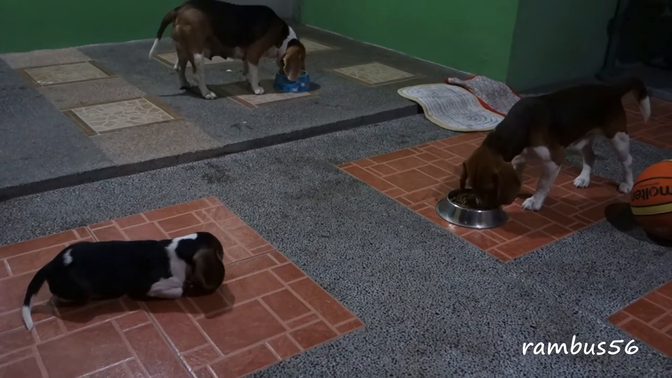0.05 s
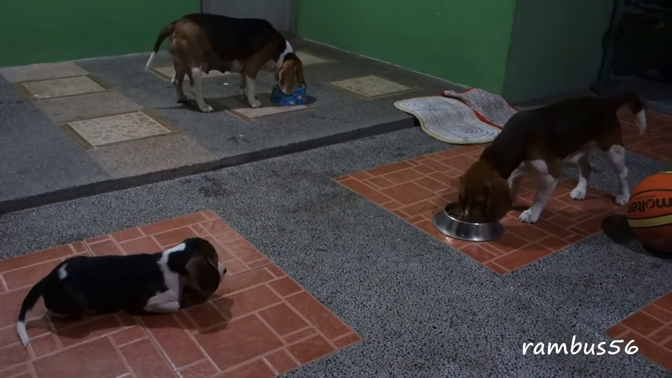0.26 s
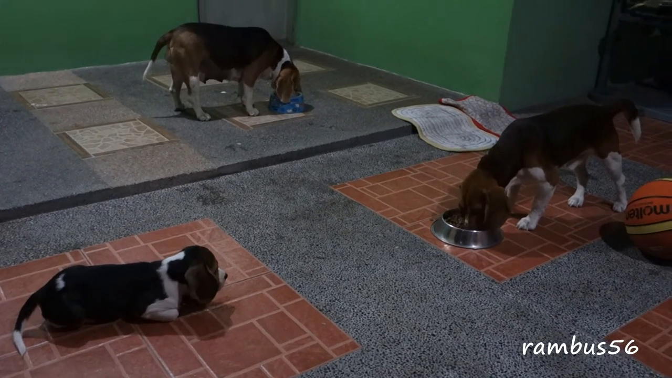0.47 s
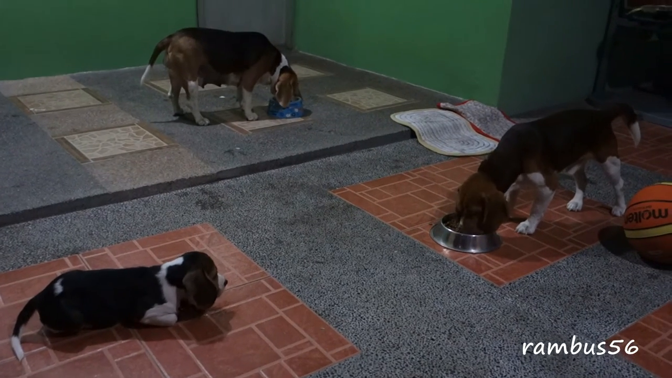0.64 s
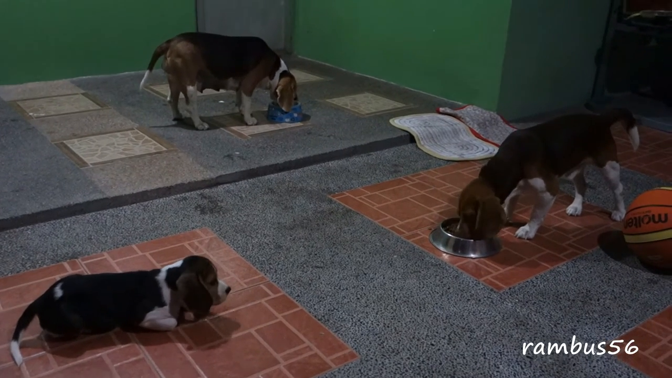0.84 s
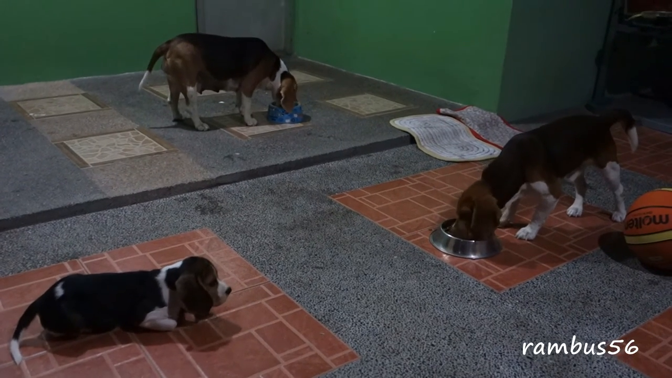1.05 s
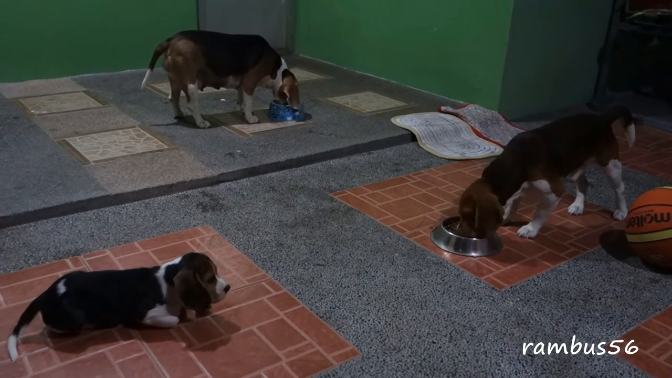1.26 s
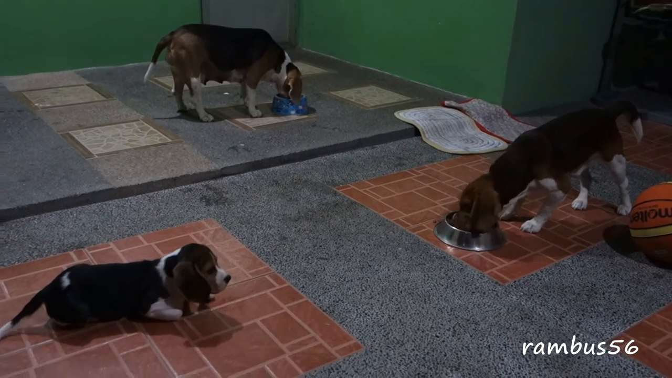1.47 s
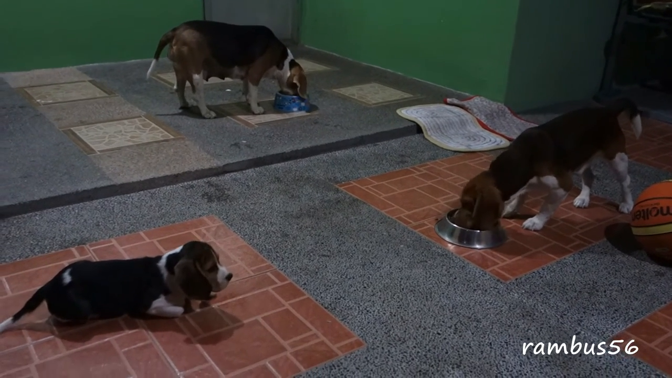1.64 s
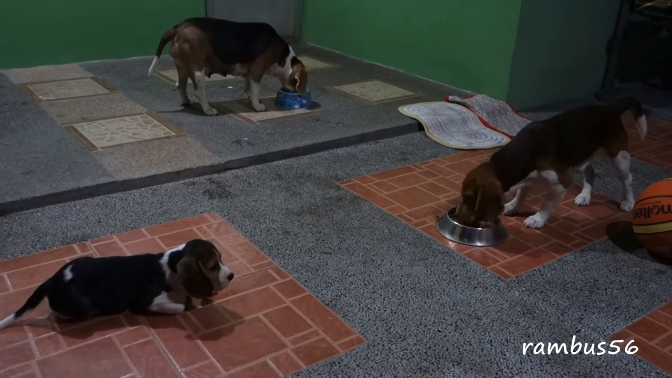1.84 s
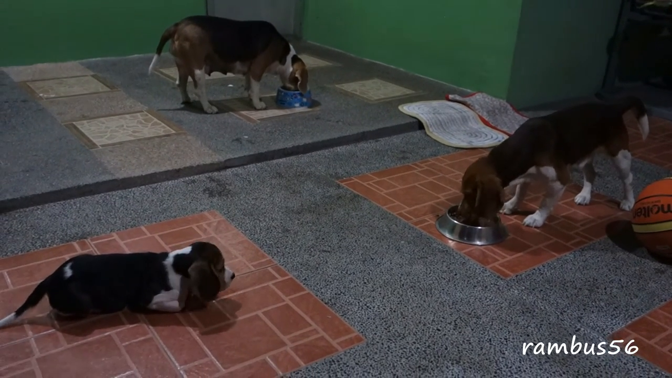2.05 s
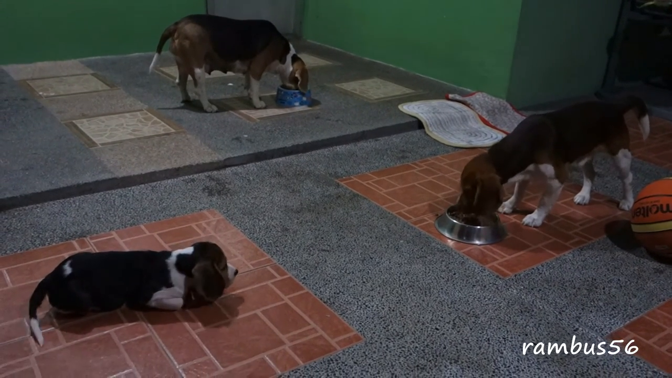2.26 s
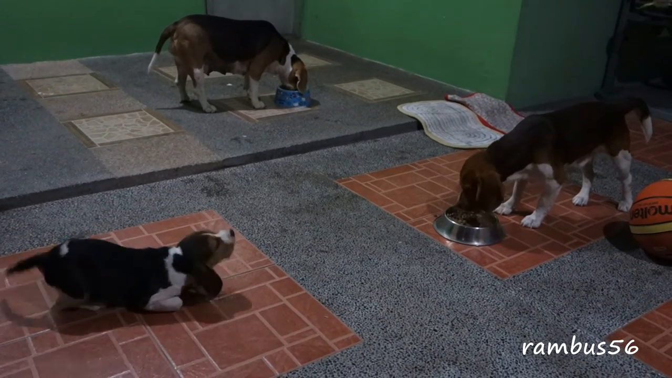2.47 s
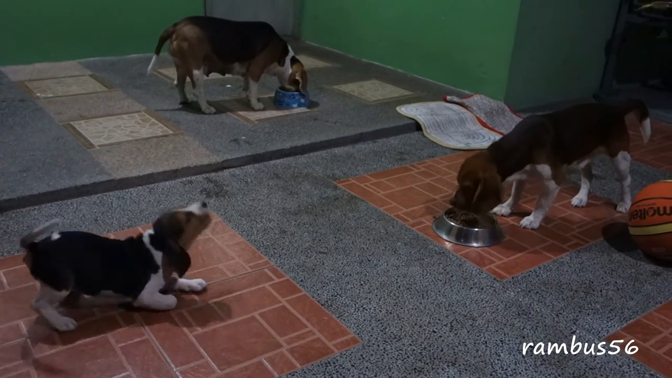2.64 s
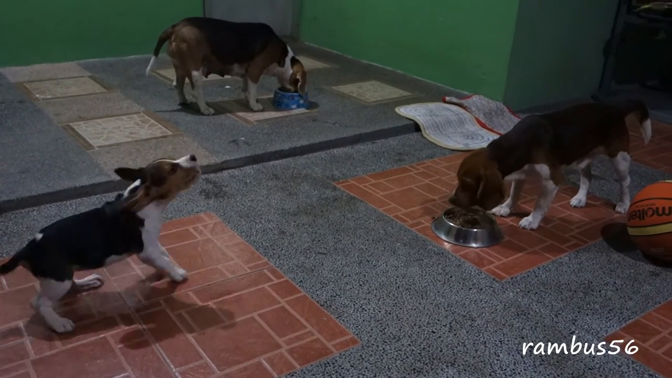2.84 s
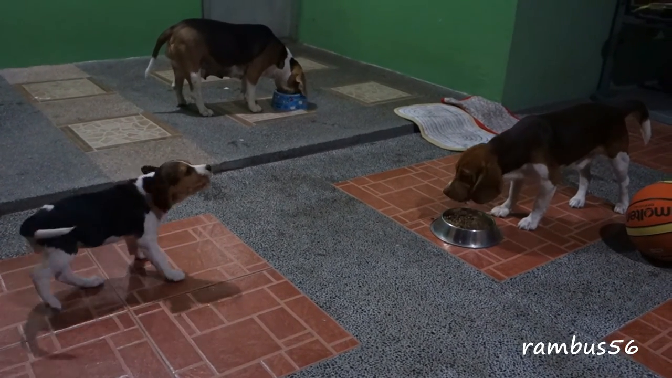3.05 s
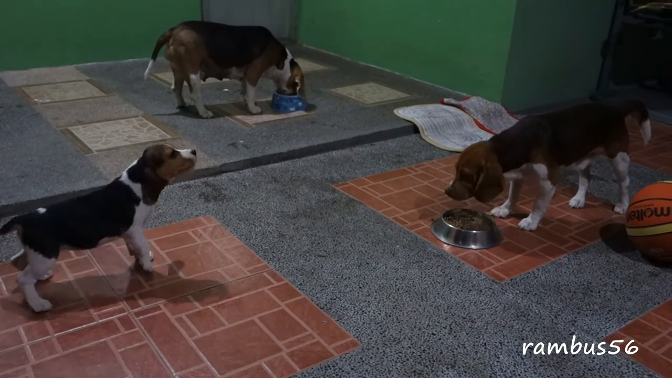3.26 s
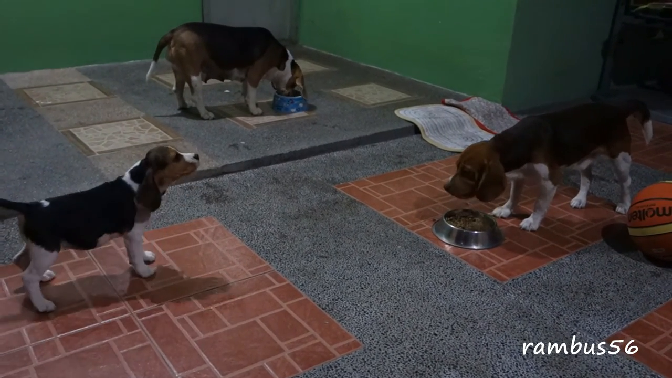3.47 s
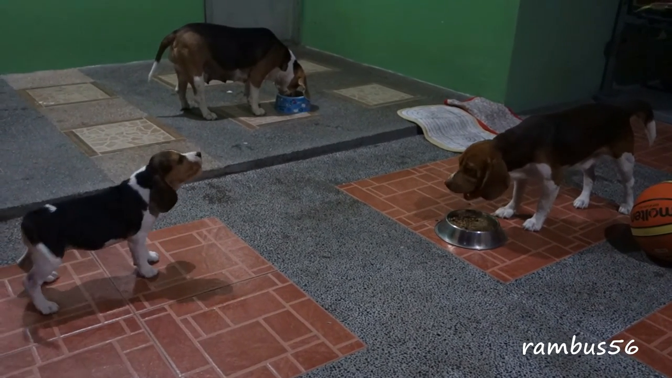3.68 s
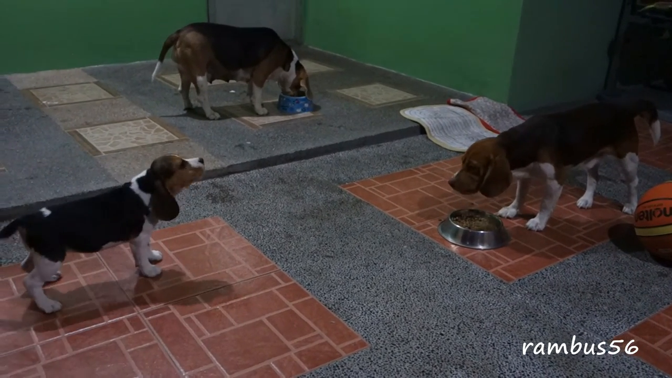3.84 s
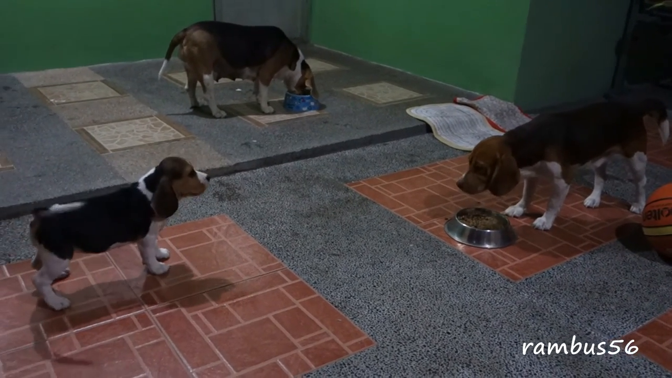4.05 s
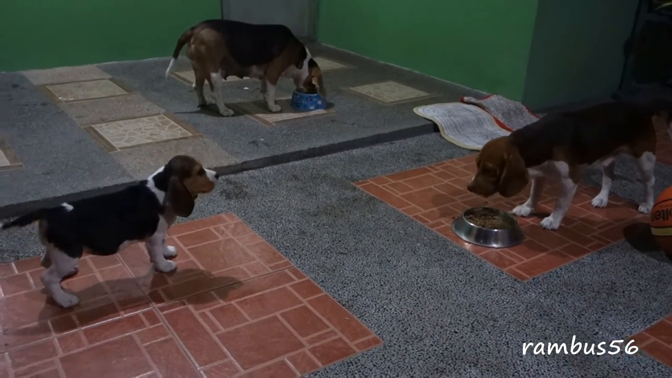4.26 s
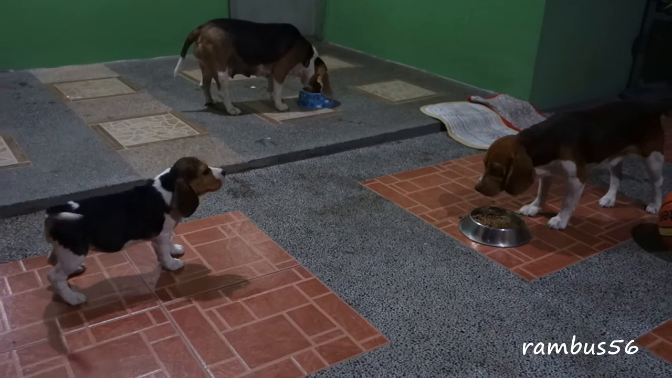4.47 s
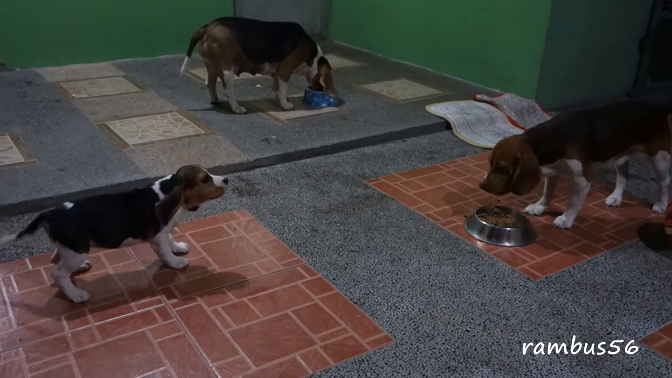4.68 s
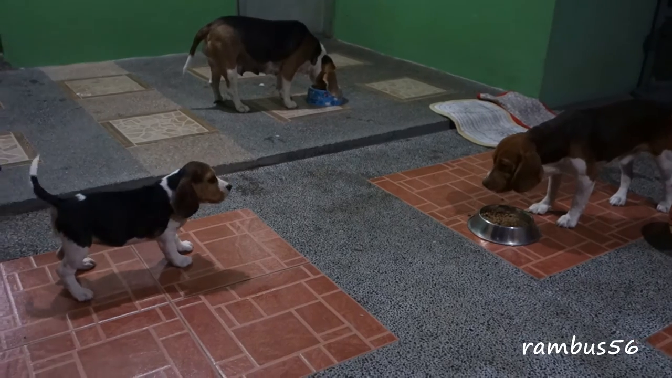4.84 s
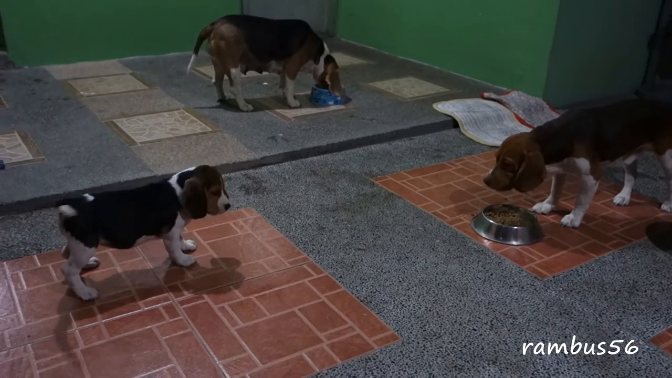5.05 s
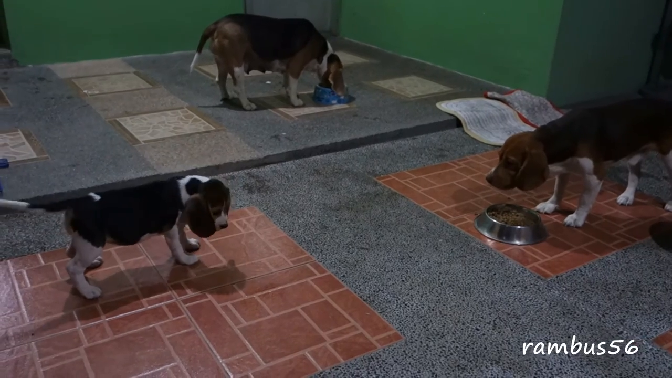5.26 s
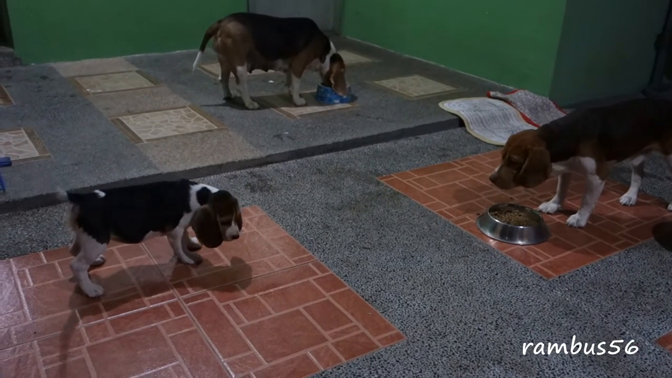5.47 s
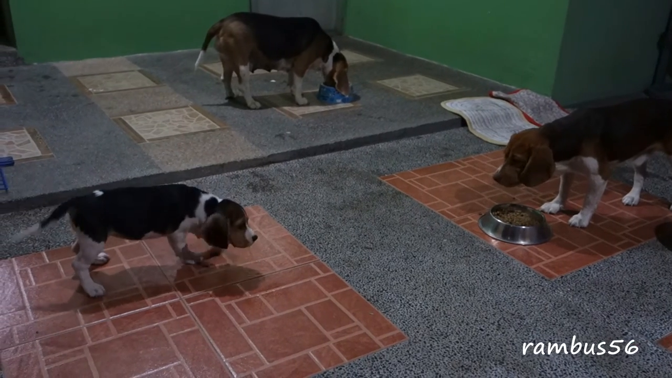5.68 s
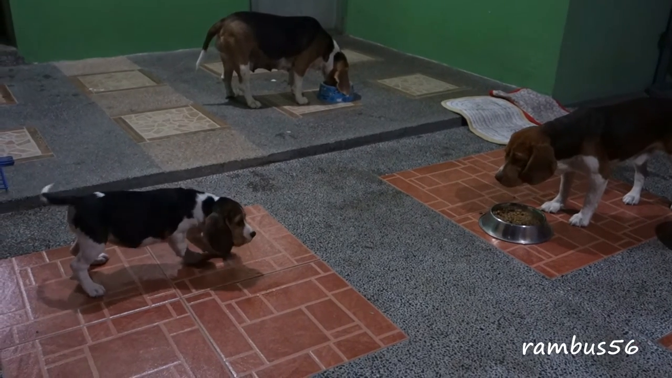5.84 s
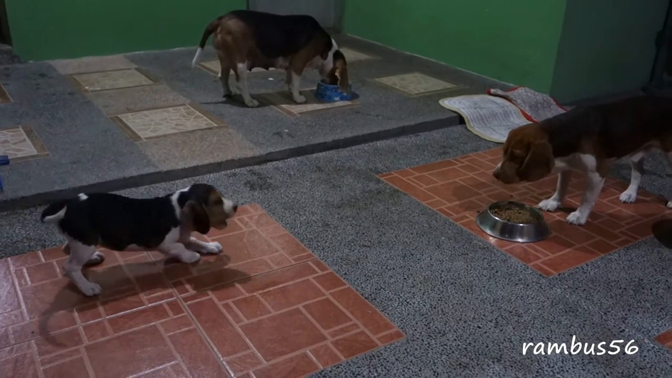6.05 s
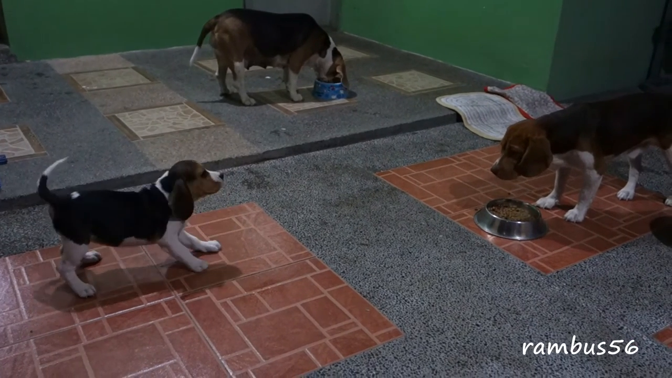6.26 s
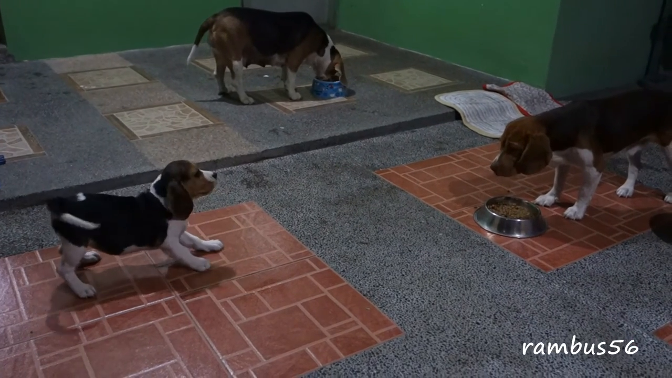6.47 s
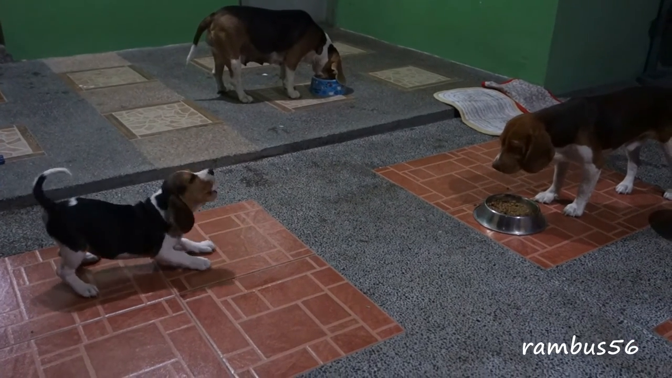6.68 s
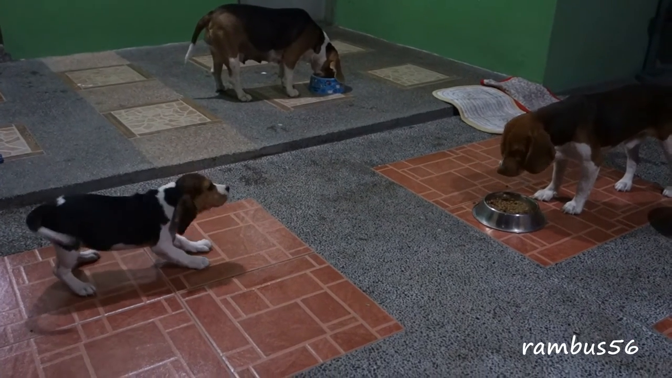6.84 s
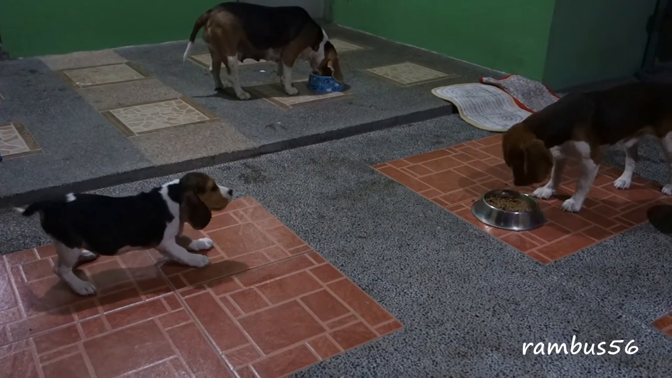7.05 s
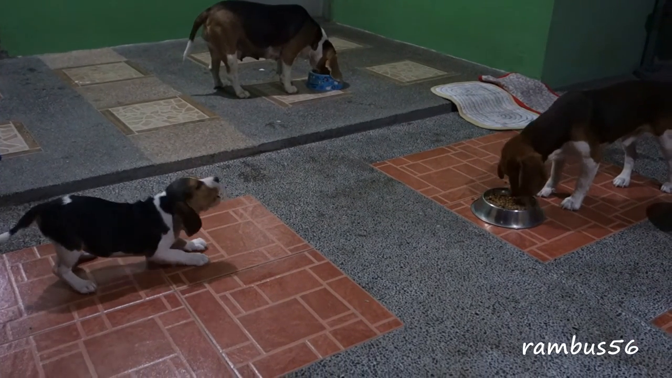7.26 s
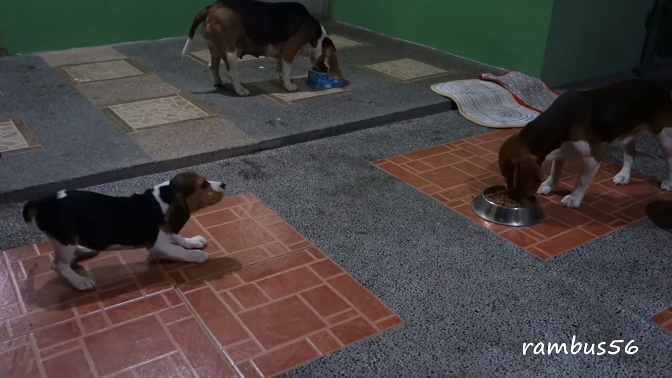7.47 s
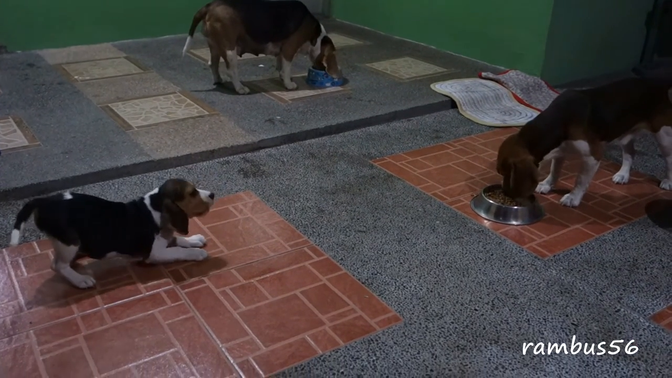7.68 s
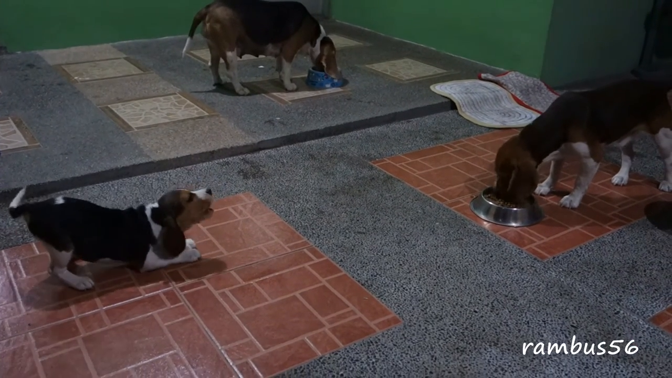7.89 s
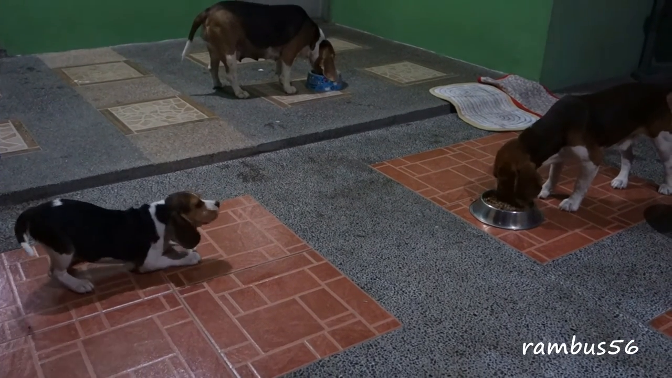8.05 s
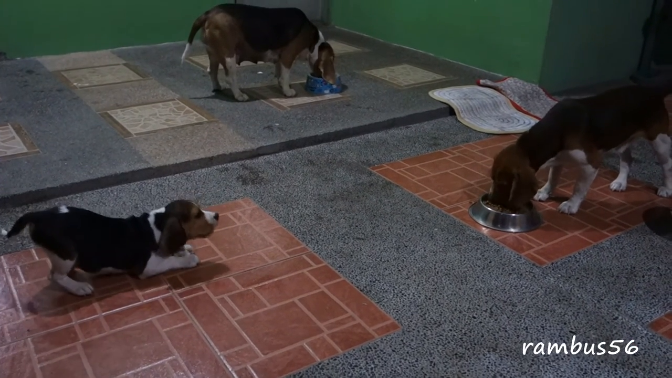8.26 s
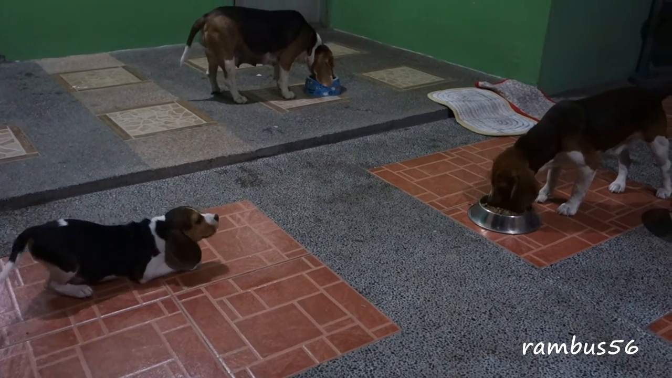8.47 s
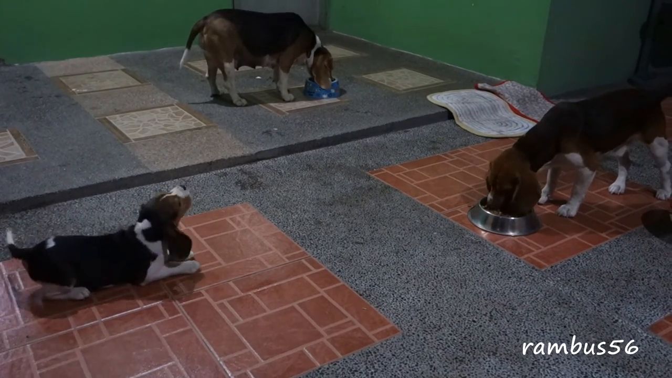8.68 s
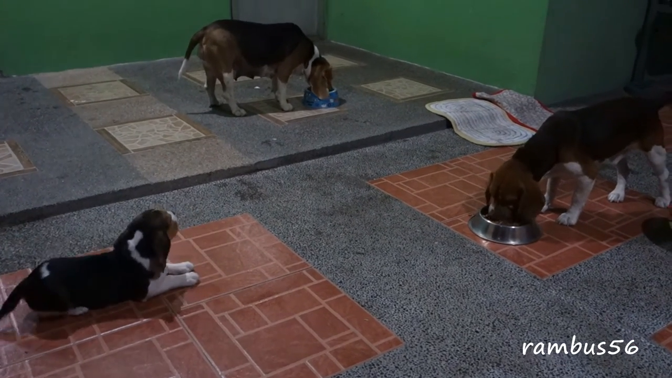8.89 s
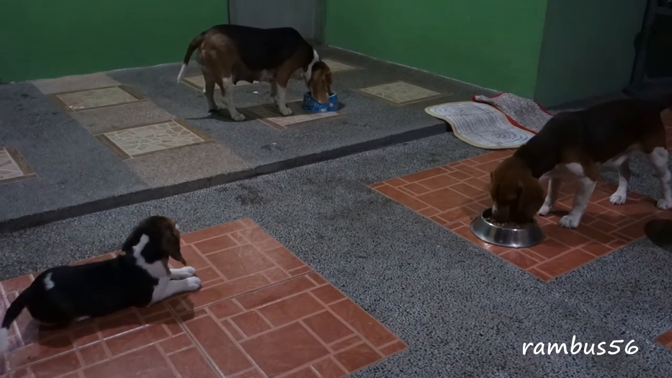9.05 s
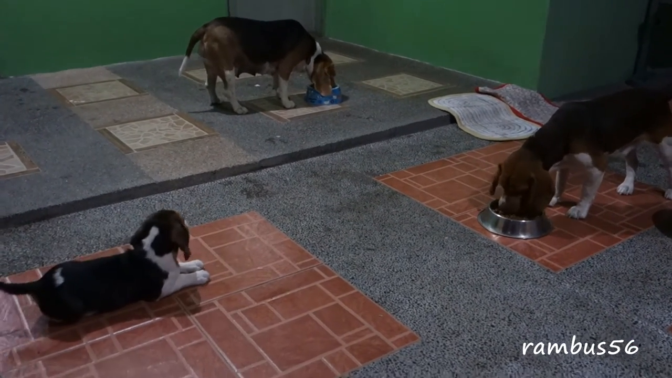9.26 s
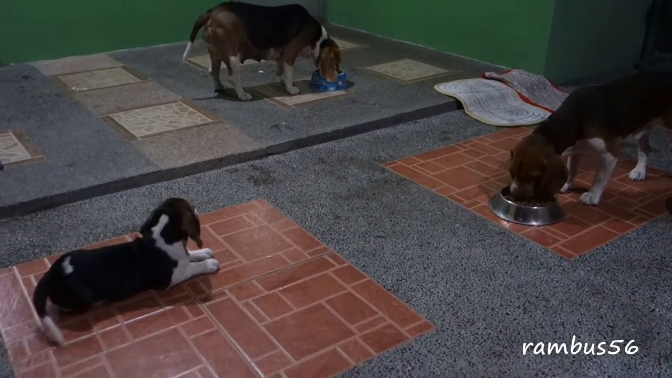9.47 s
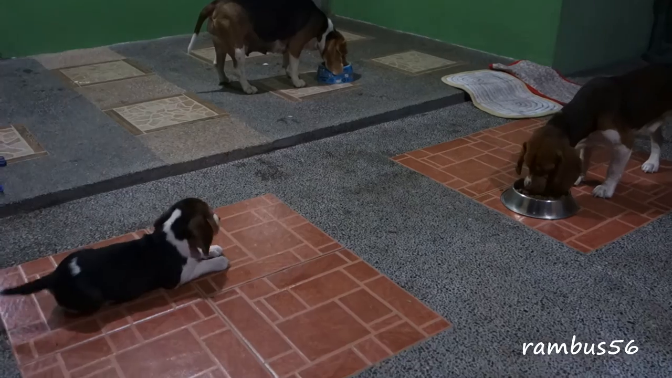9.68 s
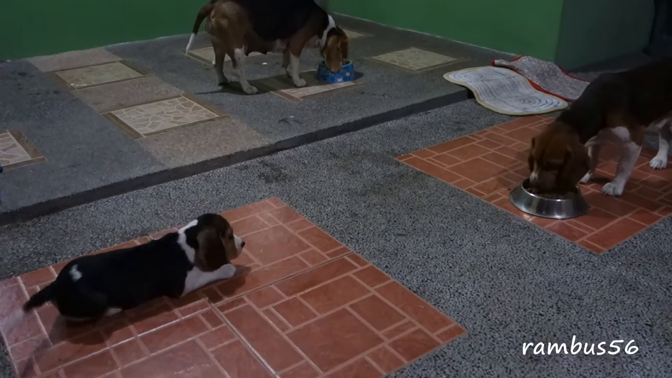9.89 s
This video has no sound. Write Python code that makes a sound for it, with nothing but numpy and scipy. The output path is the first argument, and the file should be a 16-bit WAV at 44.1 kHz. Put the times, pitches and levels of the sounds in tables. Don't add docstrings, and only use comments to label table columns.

```python
import sys
import numpy as np
from scipy import signal
from scipy.fft import rfft, irfft, next_fast_len
from scipy.io import wavfile
from scipy.ndimage import uniform_filter1d, minimum_filter1d

SR = 44100
rng = np.random.default_rng(int(sys.argv[2]) if len(sys.argv) > 2 else 0)


def master_out(mix):
    frames = np.transpose(np.atleast_2d(mix))
    ceiling = np.clip(frames, -1, 1)
    pcm = np.round(ceiling * 32767).astype(np.int16)
    wavfile.write(sys.argv[1], SR, pcm)


def gain_from_db(level_db):
    decades = np.asarray(level_db, float) / 20
    return 10 ** decades


N = 437472


def unit(x):
    return x / np.sqrt(np.mean(x ** 2) + 1e-20)


def along(points, hz):
    f, v = np.transpose(points)
    return np.interp(np.log(hz + 1), np.log(f + 1), v)


def wobble(rate, size):
    at = np.arange(size) * rate / SR
    step = at.astype(int)
    knots = rng.standard_normal(int(at[-1]) + 2)
    blend = (at - step) ** 2 * (3 - 2 * (at - step))
    return knots[step] * (1 - blend) + knots[step + 1] * blend


def filtered(x, response):
    m = next_fast_len(x.shape[-1] + 8192)
    return irfft(rfft(x, m) * response(np.fft.rfftfreq(m, 1 / SR)), m)[..., :x.shape[-1]]


def resonances(modes):
    def response(f):
        total = 0
        for k, (centre, width, db) in enumerate(modes):
            ring = 1j * f * width / (centre * centre - f * f + 1j * f * width)
            total = total + (-1) ** k * gain_from_db(db) * ring
        return total
    return response


# (frequency [Hz], likeness [0-1])
LIKENESS = [(60, 1), (180, 0.98), (540, 0.98), (1600, 0.55), (4800, 0), (14400, 0.0)]


def spread(pair):
    def mid_and_side(hz):
        angle = np.arccos(np.clip(along(LIKENESS, hz), -1, 1)) / 2
        return np.array([np.cos(angle), np.sin(angle)])
    mid, side = filtered(pair, mid_and_side)
    return np.array([mid + side, mid - side])


# (frequency [Hz], 60 dB decay time [s])
YARD_DECAY = [(300, 0.8), (800, 0.72), (2100, 0.75), (5500, 0.73), (10000, 0.44)]


def add(track, s, x, wet_db):
    hz, t, z = signal.stft(rng.standard_normal((2, 3 * SR // 4)), SR, nperseg=256)
    decay = gain_from_db(-60 * t / along(YARD_DECAY, hz)[:, None])
    tail = spread(signal.istft(z * decay, SR, nperseg=256)[1])
    tail = np.pad(tail / np.linalg.norm(tail[0]), ((0, 0), (200, 0)))
    tail = gain_from_db(wet_db) * tail
    tail[:, 0] = 1
    both = signal.fftconvolve(x[None], tail, axes=1)
    part = track[:, round(s * SR):][:, :both.shape[1]]
    part += both[:, :part.shape[1]]


# (frequency [Hz], level [dB per Hz])
NIGHT_COLOUR = [(18, -81), (30, -32.5), (179, -4), (277, -8), (453, -5.5), (490, -10), (722, -6.5),
                (911, -8), (1650, -6.5), (1980, -12), (3320, -16), (5020, -24), (6850, -19), (11500, -16),
                (14500, -18)]
# (centre [Hz], width [Hz], level [dB])
INSECT_BANDS = [(6890, 620, -58), (7830, 200, -61.5), (11900, 1100, -62)]
# (frequency [Hz], level [dB])
TONES = [(177.6, -71), (1206, -61.5), (1265, -64), (3397, -66.5), (6993, -85), (7849, -89), (10982, -72),
         (11230, -63), (11450, -68), (11897, -66.5), (12086, -81), (12301, -80)]


def night():
    z = signal.stft(rng.standard_normal((2, N)), nperseg=512)[2]
    patches = uniform_filter1d(rng.standard_normal(z.shape[1:]), 6, 0)
    patches = uniform_filter1d(patches, 14, 1)
    pair = signal.istft(z * gain_from_db(1.5 * unit(patches)), nperseg=512)[1][:, :N]
    sound = gain_from_db(-49) * unit(filtered(pair, lambda hz: gain_from_db(along(NIGHT_COLOUR, hz))))
    for centre, width, db in INSECT_BANDS:
        band = resonances([(centre, width, 0)])
        chorus = filtered(rng.standard_normal((2, N)), lambda f: band(f) ** 2)
        sound = sound + gain_from_db(db + 0.8 * wobble(3.4, N)) * unit(chorus)
    t = np.arange(N) / SR
    for hz, db in TONES:
        drift = 0.86 * wobble(2.8, N) + np.array([[0], [np.pi / 2]])
        sound = sound + gain_from_db(db + 1.5 * wobble(2.1, N)) * np.sin(2 * np.pi * hz * t + drift)
    return spread(sound)


# (time [s], peak [dB], pitch [Hz])
CRUNCHES = [(0.0525, -33, 1840), (0.1126, -42, 1550), (0.67, -44.5, 9300), (1.3518, -35.5, 2900),
            (1.5374, -48, 8750), (1.9803, -49.5, 8600), (2.149, -39.5, 790), (2.285, -48.5, 9160),
            (2.9677, -32.5, 800), (3.2844, -25, 993), (5.483, -26.5, 11500)]


def crunching(track):
    t = np.arange(4000) / SR
    for s, db, hz in CRUNCHES:
        snap = rng.standard_normal(len(t)) * gain_from_db(-60 * t / 0.049)
        bowl = resonances([(hz, 0.11 * hz, 6), (0.68 * hz, 0.14 * hz, 3),
                           (0.3 * hz, 0.057 * hz, 4), (0.8 * hz, 0.075 * hz, -3)])
        add(track, s, gain_from_db(db + 3) * filtered(snap, bowl), wet_db=3.5)


# (centre [Hz], width [Hz], level [dB])
MOUTH_FRONT = [(1426, 57, -2), (2160, 390, 4), (2500, 700, 4), (3300, 820, -5), (4400, 310, -12.5)]
# (centre [Hz], width [Hz], amount taken out [dB])
VOICE_DIPS = [(1060, 900, -15.5), (2228, 416, -4), (5175, 2800, 1.5)]


def bark(rows, ratio, manner, shapes, lips, top_hz):
    flutter_db, soft, puff_db, hiss_db = manner
    s, *cols = np.transpose(rows)
    t = np.arange(s[0], s[-1], 1 / SR)
    size = len(t)
    hz, effort_db, rough, half, mouth = [np.interp(t, s, c) for c in cols]
    rough, half, mouth = np.clip([rough, half, mouth], 0, 1)

    turns = np.cumsum(hz * (1 + 0.065 * rough * wobble(248.5, size))) / SR
    k = np.arange(2, 45)[:, None] / 2
    weight = np.where(k % 1, half, 1) * k ** -soft * (k * hz < 14000)
    folds = unit(np.sum(weight * np.cos(2 * np.pi * k * turns), axis=0))
    folds = folds * gain_from_db(5.8 * rough * wobble(158, size))
    flutter = np.cos(2 * np.pi * ratio * turns + 0.95 * wobble(116.5, size))
    folds = folds + gain_from_db(flutter_db) * flutter
    breath = rng.standard_normal((3, size)) * (1 + 1.27 * np.cos(2 * np.pi * turns))

    source = gain_from_db(effort_db) * (np.sqrt(1 - rough) * folds + 1.09 * rough * breath[0])
    source = source * np.clip(1 - np.abs(2 * mouth - np.arange(3)[:, None]), 0, 1)
    age = t - s[0]
    puff = gain_from_db(puff_db - 60 * age / 0.27) * (1 - np.exp(-age / 0.047)) * breath[2]

    voice = 0
    for part, shape in zip([*source, puff], [*shapes, MOUTH_FRONT]):
        voice = voice + filtered(np.pad(part, (0, 2000)), resonances(shape))
    voice = filtered(voice, lambda f: (1j * f / (380 + 1j * f)) ** 4 / (1 + 1j * f / top_hz) ** 3)
    for dip in VOICE_DIPS:
        voice = voice - filtered(voice, resonances([dip]))

    jet_level = gain_from_db(effort_db + 5.5 * mouth + 4 * wobble(58.2, size))
    jet = jet_level * (gain_from_db(6 * rough) * breath[1] + 0.45 * folds)
    air = np.pad(gain_from_db(hiss_db - 25) * (jet + 3 * puff), (0, 2000))
    shifted = 1 + 0.015 * rng.standard_normal()
    air = filtered(air, lambda f: resonances(lips)(f * shifted) ** 2)
    return gain_from_db(10) * voice + gain_from_db(7.5) * air


SILENT_DB = 19.5

# (start [s], first pitch [Hz], last pitch [Hz], effort [dB], half-pitch share [0-1])
GRUNT_CALLS = [
    (5.984, 620, 798, -11, 0.27),
    (7.185, 634.5, 773.5, -10, 0),
    (7.798, 680, 755, -13, 0.26),
    (8.42, 511.5, 1091, -14, 0.59),
]


def grunt(s):
    attack, rough = 0.27, 0.11
    jaws_part_s, break_s = 0.06, 0.009
    for start, first_hz, last_hz, db, half in GRUNT_CALLS:
        length = s - break_s - start
        if 0 < length < 0.15:
            shut_end = min(length - 0.001, jaws_part_s)
            open_start = min(length, jaws_part_s + break_s) - 0.0005
            at = np.array([0, attack * length, shut_end, open_start, length])
            hz = first_hz * (last_hz / first_hz) ** (at / length)
            return [(start + a, f, db - SILENT_DB * (a == 0), rough, half, a > jaws_part_s)
                    for a, f in zip(at, hz)]
    return []


HOARSE_SHAPE = (1.17, 1.56, 0.13, 0.48, 0.92)
HALF_PITCH_SHAPE = (1.1, 1.5, 0.47, 0.73, 1.56)
GAPE_SHAPE = (.4, 0.73, 1.007, 1.016, 0.43)


def controls(call, voicing):
    s, rise, hold, top_hz, db = call
    opening, hoarse, half, mouth, lost_db = voicing
    lead = grunt(s)
    attack = 0 if lead else 0.33 * rise
    at = s + np.array([0, attack, rise, rise + hold, rise + hold + 0.05])
    fall_sag = 0.87 if top_hz < 700 else 0.93
    hz = top_hz * np.array([0.92 * opening, opening, 1, 0.98, fall_sag])
    effort_db = db - np.array([SILENT_DB, 5, 0, lost_db, lost_db + 4])
    rows = np.transpose([at, hz, effort_db, hoarse * np.array(HOARSE_SHAPE),
                         half * np.array(HALF_PITCH_SHAPE), mouth * np.array(GAPE_SHAPE)])
    halfway = rows[1] + (rows[2] - rows[1]) * np.array([0.5, 0.7, 0.7, 0.7, 0.7, 0.7])
    return [*(lead or rows[:1]), rows[1], halfway, *rows[2:]]


# (start [s], rise [s], hold [s], top pitch [Hz], top effort [dB])
BARK_CALLS = [(2.368, 0.054, 0.059, 605.8, -3), (2.591, 0.051, .05, 615, -3), (2.808, .035, .075, 800, -14),
              (2.949, .085, 0.029, 545, -12), (3.629, .065, 0.037, 620, -2), (4.443, .08, 0.046, 655, -4),
              (5.477, 0.031, 0.06, 643.7, -7), (6.022, 0.027, 0.044, 632.1, -1.5),
              (6.615, .054, .06, 615.9, -5.5), (7.228, 0.035, .045, 635.5, -1.5),
              (7.843, 0.034, 0.045, 627.7, -7), (8.538, 0.034, 0.037, 849, -5.5)]
# (opening pitch over top [ratio], hoarseness [0-1], half-pitch share [0-1],
# mouth opening [0-1], effort lost in the hold [dB])
BARK_VOICING = [(.72, 1.32, 0.57, 0.57, 5.5), (.8, 0.34, 0.11, .55, 0), (1.1, 0.5, 0.6, 0.28, 11),
                (.8, 0.16, 0.2, 0.58, 9), (.77, 0.41, 0.21, 0.47, 2.5), (0.78, 0.56, 0.1, 0.57, 4.5),
                (.88, 1, 0.93, 0.37, 5), (.89, 0.44, 0.64, 0.93, 8.5), (0.82, .4, 0.56, 0.73, 6),
                (.89, 0.36, 0.49, .92, 6.5), (.88, 0.25, 0.22, 1, 1.5), (.98, 0.08, 0.1, 0.69, 3)]
# (second rhythm [dB], softness of fold closure [0-1], opening puff [dB], hiss [dB])
BARK_MANNER = [(-7.5, 0.12, -10, -3), (-18.5, 0.19, -48, -2.5), (-11, 1, -31, 5.5), (-4, 0.54, -23, -1.5),
               (-11, 0, -34, -6.5), (-8.5, 0.21, -3.5, -3), (-23, 0.61, 3, 1.5), (-13.5, 0.31, -1, 2),
               (-25, 0.13, -9, -3.5), (-13, 0.09, -3.5, 0.5), (-11.5, 0.31, -5, 0.5), (-30, 0.21, -23, -1)]
FLUTTER_RATIO = [1.4, 1.6, 1.3, 1.8, 2.3, 2.32, 2.3, 2.27, 2.35, 2.28, 2.3, 1.3]
HOWLED = (1, 2, 3)
# (centre [Hz], width [Hz], level [dB])
MOUTH_SHUT = [(635, 500, -2.5), (1400, 240, -56), (2640, 240, -57)]
MOUTH_HALF = [(620, 1040, -7), (1142, 510, 0), (1504, 92, 1), (1840, 301, 0.5), (2530, 300, -9),
              (2950, 92, -34.5)]
MOUTH_OPEN = [(583, 1900, -9.5), (1430, 1690, -2.5), (1724, 203, 5), (2532, 280, 5), (3062, 530, -5),
              (4400, 220, -23.5)]
# (centre [Hz], width [Hz], level [dB])
LIPS_ROUND = [(800, 630, 6), (1670, 150, 2), (3240, 310, -49)]
LIPS_PARTED = [(537, 620, -5), (1240, 376, 2.5), (1846, 530, -17.5), (3100, 330, -48)]
# (centre [Hz], width [Hz], level [dB])
TEETH_HISS = [(8500, 870, -4.5), (9870, 940, 0), (11500, 2030, -7)]
LIP_WHISTLE = [(8400, 190, -6), (10300, 770, -1), (12800, 450, -11)]


def barking(track):
    for n, (call, voicing) in enumerate(zip(BARK_CALLS, BARK_VOICING)):
        rows = controls(call, voicing)
        if n in HOWLED:
            throat = (LIPS_ROUND, LIPS_PARTED, LIPS_PARTED), LIP_WHISTLE, 3000
        else:
            throat = (MOUTH_SHUT, MOUTH_HALF, MOUTH_OPEN), TEETH_HISS, 4300
        add(track, rows[0][0], bark(rows, FLUTTER_RATIO[n], BARK_MANNER[n], *throat), wet_db=2.5)


# (start [s], length [s], level [dB], centre [Hz])
BREATHS = [
    (3.366, 0.24, -55, 3360),
    (5.006, 0.59, -52.5, 1400),
    (5.723, 0.24, -41, 4560),
    (6.946, 0.23, -46.5, 4400),
    (7.515, 0.28, -46, 3950),
    (7.608, 0.13, -46.5, 8540),
    (8.194, 0.23, -53, 3840),
    (9.249, 0.061, -49, 480),
    (9.67, 0.22, -57.5, 1390),
]


def panting(track):
    for s, length, db, hz in BREATHS:
        mouth = resonances([(hz, min(0.6 * hz, 2300), 0)])
        air = filtered(rng.standard_normal(round(length * SR)), lambda f: mouth(f) ** 2)
        add(track, s, gain_from_db(db) * unit(air) * np.hanning(len(air)), wet_db=-0.5)


def scene():
    dogs = np.zeros((2, N))
    crunching(dogs)
    barking(dogs)
    panting(dogs)
    return night() + dogs


def roll_off(x):
    return signal.sosfilt(signal.butter(12, 14950, fs=SR, output="sos"), x)


# (frequency [Hz], level [dB])
MIC_TREBLE = [(12000, -1), (13200, 1), (14000, -9.5), (14800, -58.5)]
# (frequency [Hz], left minus right [dB])
PORT_BALANCE = [(200, 0), (1400, 0.9), (4200, 0), (6000, -6), (8000, -10), (10500, -13.5), (12000, -5),
                (14400, 6)]
# (time [s], level [dB])
CREEPING_GAIN = [(0, 2.5), (2.37, 2.5), (2.45, 1.5), (3.6, -1), (5.4, -3), (7, 0), (9, -2.5), (9.6, 0),
                 (9.92, 1.5)]


def record(dry):
    ports = np.array([[0.5], [-0.5]])
    x = filtered(dry, lambda hz: gain_from_db(along(MIC_TREBLE, hz) + along(PORT_BALANCE, hz) * ports))
    x = x * gain_from_db(np.interp(np.arange(N) / SR, *np.transpose(CREEPING_GAIN)))
    level = np.sqrt(np.abs(uniform_filter1d(np.mean(x ** 2, axis=0), 900)))
    gain = (1 + (level / gain_from_db(-13)) ** 4) ** -0.23
    x = x * uniform_filter1d(minimum_filter1d(gain, 300), 500)
    swing = gain_from_db(-29.5) * np.mean(x, axis=0) ** 2
    x = x + filtered(swing, lambda f: 1j * f / (20 + 1j * f) / (1 + 1j * f / 45) ** 2)
    x = x / (1 + np.abs(x / 1.1) ** 6) ** (1 / 6)
    return roll_off(x)


dry = scene()
out = record(dry)
master_out(out)
```